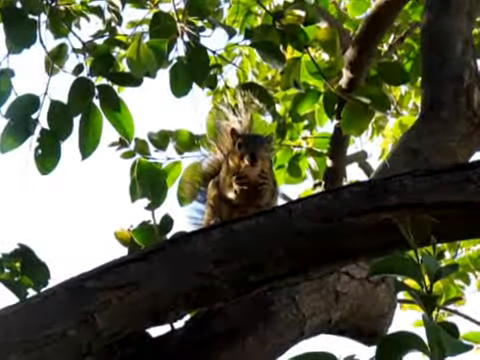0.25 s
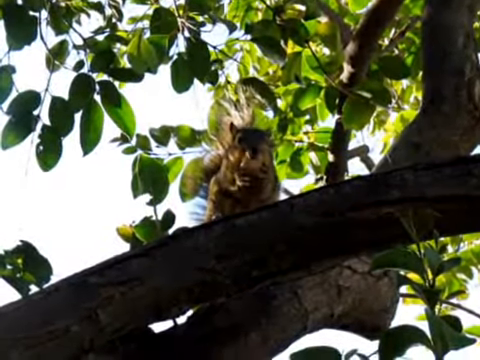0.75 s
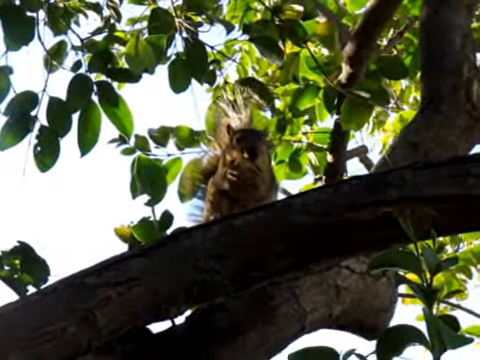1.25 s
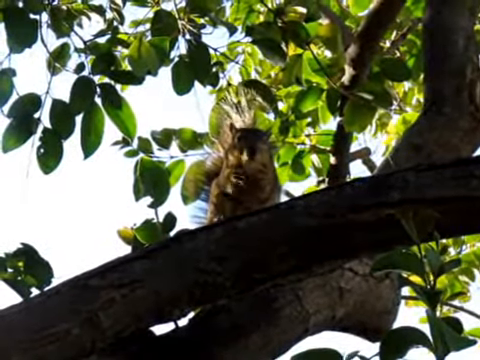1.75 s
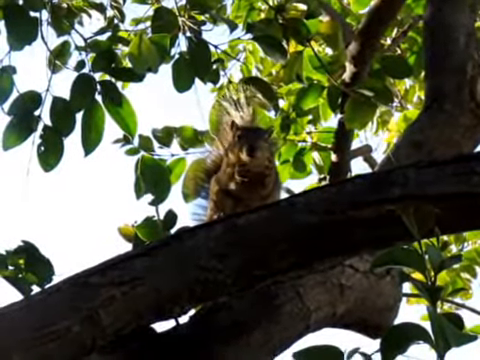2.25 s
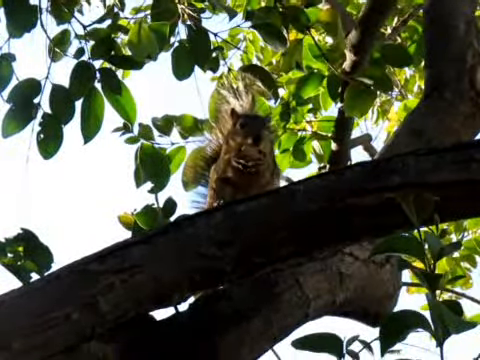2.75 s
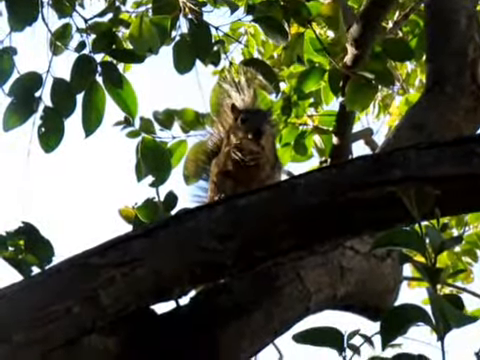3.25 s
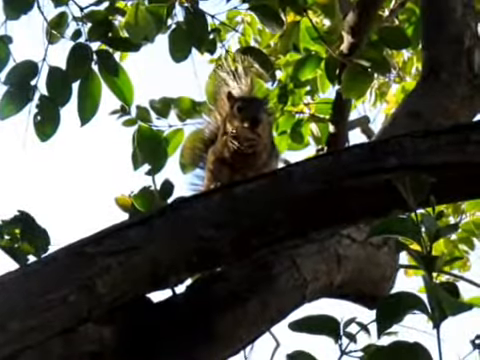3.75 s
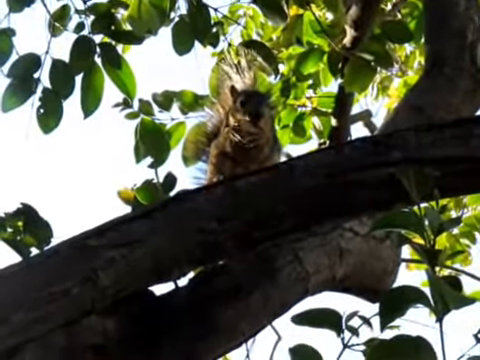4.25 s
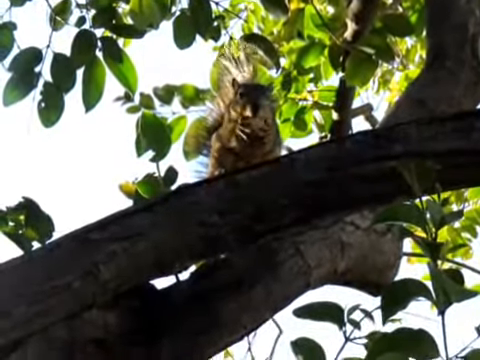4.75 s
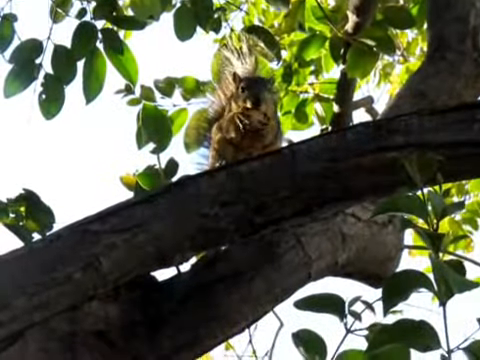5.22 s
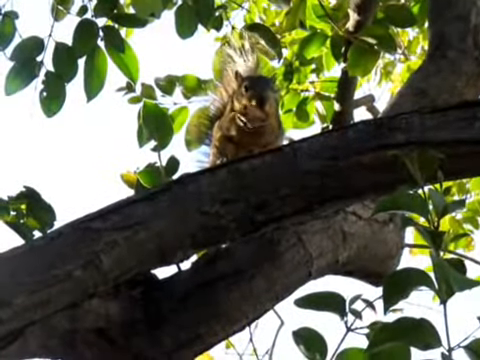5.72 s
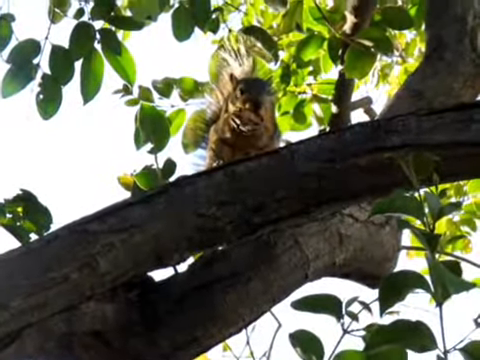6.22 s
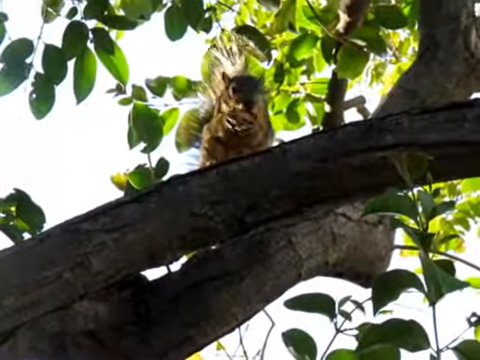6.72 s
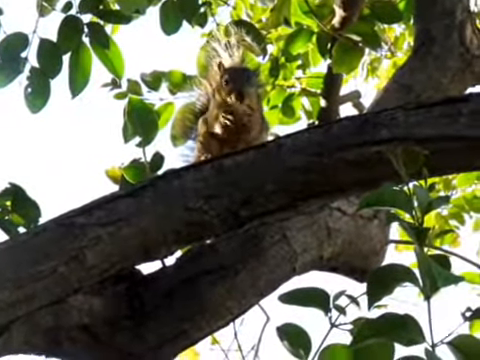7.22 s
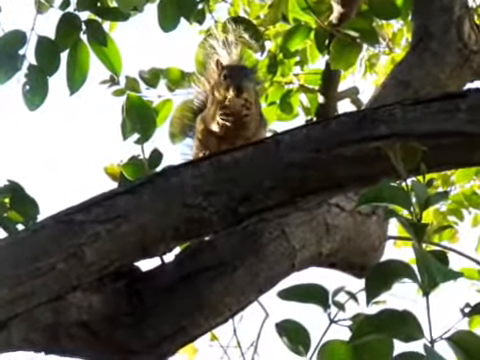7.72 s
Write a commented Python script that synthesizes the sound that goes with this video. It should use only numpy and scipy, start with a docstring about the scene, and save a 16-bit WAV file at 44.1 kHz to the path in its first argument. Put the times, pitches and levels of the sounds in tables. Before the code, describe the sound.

A steady low rumble of far traffic, a faint tonal machine drone and airy leaf rustle run throughout, with the leaves swelling in light gusts around 1.5-3.9 s and then easing. At 0.0-0.2 s a small bird gives a thin, very high buzz sliding down. Sparrows chirp all along: short falling cheeps from deep in the foliage and warbling, nearer chirrups around 0.1, 1.3, 4.3 and 6.4 s. A distant raspy trill pulses in bouts until about 4 s. A squirrel's teeth make faint dry ticks near 0.4, 2.1 and 3.7 s. A sharp, bright shell crack lands at 5.3 s, with small ticks after; a very faint high buzz follows at 5.7 s. The loudest crack snaps at 6.9 s, and the background dips for half a second. A falling sparrow warble comes at 7.4 s, with last cheeps to 8 s.

```python
"""Far traffic rumbles, a machine drones and leaves rustle throughout, all made of filtered noise and soft tones.
A small bird opens with a high falling buzz, a fast-swept whistle; sparrows chirp all along in quavering whistles.
Early on a distant bird trills in pulsed bouts, and a squirrel gnaws a nut: faint ticks that set the shell ringing.
Later come two sharp cracks of the shell, near 5.3 s and 6.9 s, and a second, much fainter buzz between them.
The loudest crack makes the recorder's gain control duck for half a second; a falling warble comes near the end."""
import sys
import numpy as np
from scipy import signal
from scipy.fft import rfft, irfft
from scipy.io import wavfile
from scipy.ndimage import minimum_filter1d

SR = 44100
rng = np.random.default_rng(int(sys.argv[2]) if len(sys.argv) > 2 else 0)


def wav_out(sig):
    """Save sig, one row per channel (or a flat mono array), as 16-bit PCM at SR to the path in sys.argv[1]."""
    wavfile.write(sys.argv[1], SR, np.round(np.clip(np.atleast_2d(sig).T, -1, 1) * 32767).astype(np.int16))


N = 351477
TIME = np.arange(N) / SR


def from_db(db):
    """Turn decibels into a factor for the wave's height."""
    return 10 ** (np.asarray(db) / 20)


def rms_one(x):
    """Scale a sound to an average power of one."""
    return x / np.sqrt(np.mean(x ** 2) + 1e-20)


def level_curve(rows):
    """Join points of time and level with straight lines, giving dB at every sample."""
    s, db = np.transpose(rows)
    return np.interp(TIME, s, db)


def add(out, s, sound):
    """Mix a sound in from a given second, cutting off what runs past the end."""
    start = max(int(s * SR), 0)
    part = sound[:max(N - start, 0)]
    out[start:start + len(part)] += part


def coloured_noise(spectrum):
    """Shape random noise to a spectrum and bring it to unit power."""
    hz, db = np.transpose(spectrum)
    bins = np.maximum(np.fft.rfftfreq(N, 1 / SR), 1)
    gain = from_db(np.interp(np.log(bins), np.log(hz), db))
    gain = gain * np.minimum(bins / hz[0], 1) ** 2  # fade out below the lowest point
    return rms_one(irfft(rfft(rng.standard_normal(N)) * gain, N))


def drift(rate):
    """Wander at random around zero with a spread of one, taking `rate` new values per second."""
    knots = rng.standard_normal(4096)
    return rms_one(np.interp(TIME * rate, np.arange(len(knots)), knots))


def resonate(x, hz, width_hz):
    """Ring like a body with one favourite pitch, where the gain is one; a narrow width rings longer."""
    r = np.exp(-np.pi * width_hz / SR)
    top = np.array([1, 0, -1]) * (1 - r * r) / 2
    return signal.lfilter(top, [1, -2 * r * np.cos(2 * np.pi * hz / SR), r * r], x)


def band(x, low_hz, high_hz, order):
    """Keep only the sound between two frequencies."""
    sos = signal.butter(order, [low_hz, high_hz], "band", fs=SR, output="sos")
    return signal.sosfilt(sos, x)


def scatter(x, t60, gap):
    """Countless small echoes from leaves and branches start after `gap` s and sink 60 dB in `t60` s."""
    t = TIME[:SR // 2]
    echoes = rng.standard_normal(len(t)) * from_db(-60 * t / t60) * (t > gap)
    # together the echoes are as strong as the sound itself
    return signal.oaconvolve(x, echoes / np.linalg.norm(echoes))[:N]


def swell(s, length, rise_s, fall_s):
    """Rise from 0 to 1, hold, and be back at 0 when the length is over."""
    return np.clip(np.minimum((TIME - s) / rise_s, (s + length - TIME) / fall_s), 0, 1)


def tone(hz):
    """Sound a pure sine of unit power that follows a pitch."""
    return np.sqrt(2) * np.sin(2 * np.pi * np.cumsum(hz) / SR)


# spectrum of the far roads: (f/Hz, level/dB per Hz)
ROAD_SPECTRUM = [(18, 0), (33, 1), (50, -2.5), (75, -3), (110, -9), (190, -16), (260, -18.5), (500, -25.5),
                 (1000, -32), (1600, -39.5), (2500, -44.5), (5000, -50), (9500, -57), (12000, -78.5)]
# loudness of the far roads: (t/s, level/dB)
ROAD_LEVEL = [(0.0, -31), (7.97, -32.5)]
# narrow bands in which a far machine drones: (f/Hz, width of each filter/Hz, level/dB)
MACHINE_BANDS = [(76, 27, -50.5), (252, 15.3, -54.5), (520, 29, -63), (1892, 29, -72)]
# distant engines that come and go: (t/s, length/s, f/Hz, level/dB)
ENGINE_PASSES = [(1.15, 1.5, 421.3, -53), (2.8, 2.01, 444, -61)]


def traffic(whine_hz=339, whine_db=-55.0, whine_waver=0.00568, engine_waver=0.00845, engine_fade_s=0.4):
    """Far roads are noise, a machine's drone is noise in narrow bands, its whine and engines are wavering tones."""
    roads = from_db(level_curve(ROAD_LEVEL)) * coloured_noise(ROAD_SPECTRUM)
    hum = 0
    for hz, width_hz, db in MACHINE_BANDS:
        noise = rng.standard_normal(N)
        narrow = resonate(resonate(noise, hz, width_hz), hz, width_hz)
        hum = hum + from_db(db) * rms_one(narrow)
    # wavers are shares of the pitch
    whine = from_db(whine_db + 2 * drift(11)) * tone(whine_hz * (1 + whine_waver * drift(20)))
    engines = 0
    for s, length, hz, db in ENGINE_PASSES:
        level = from_db(db + 2 * drift(10)) * swell(s, length, engine_fade_s, engine_fade_s)
        engines = engines + level * tone(hz * (1 + engine_waver * drift(25.06)))
    return roads + hum + whine + engines


# spectrum of the moving leaves: (f/Hz, level/dB per Hz)
LEAF_SPECTRUM = [(1000, 8), (2000, 1), (3300, 8.5), (5000, 2), (7000, 2), (8300, 4), (9400, 5.5),
                 (10300, -3), (10900, -7.5), (11700, -20), (13000, -110)]
# leaves in the slackening breeze, before gusts and flutter: (t/s, level/dB)
BREEZE_LEVEL = [(0, -56), (5.2, -60.5), (8, -61)]
# gusts: (t/s, length/s, rise in level/dB)
GUST_TIMES = [(1.446, 1, 5), (2.498, 1.39, 5)]
# brief brushing rustles, before flicker: (t at the middle/s, half length/s, level/dB)
BRUSH_TIMES = [(1.562, 0.056, -52.5), (3.66, 0.041, -53.5)]
# spectrum of the brushing: (f/Hz, level/dB per Hz)
BRUSH_SPECTRUM = [(1200, -13), (2200, 6.5), (5000, 7), (7000, 1.5), (11000, -18)]


def foliage(flutter_db=1.14, gust_build_s=0.78, gust_drop_s=0.13):
    """Leaves hiss in light air and gusts that build slowly and drop quickly; twice something brushes them."""
    gusts_db = sum(db * swell(s, length, gust_build_s, gust_drop_s) for s, length, db in GUST_TIMES)
    leaves_db = level_curve(BREEZE_LEVEL) + gusts_db + flutter_db * drift(25)
    leaves = from_db(leaves_db) * coloured_noise(LEAF_SPECTRUM)
    strokes = sum(from_db(db) * np.exp(-((TIME - s) / half) ** 2) for s, half, db in BRUSH_TIMES)
    brushing = strokes * from_db(2.6 * drift(200)) * coloured_noise(BRUSH_SPECTRUM)
    return leaves + brushing


# bouts of trilling, levels before flicker and trim:
# (t/s, length/s, middle f/Hz, first pulses per s, last pulses per s, level/dB)
TRILL_BOUTS = [(-.1, 0.68, 3870, 27, 30, -62), (0.545, 0.53, 3870, 26.2, 27.5, -59),
               (1.475, 0.93, 3950, 23.5, 30, -60.5), (2.68, 1.38, 3970, 27, 28, -64)]


def distant_trill(sag=.15, rasp=.04, wander=.009, fade_s=0.16, flicker_db=-0.5, direct_db=-1, echo_db=-6):
    """A distant bird's raspy pulses quicken in each bout; each starts at a slightly different pitch and sags."""
    song = 0
    for s, length, hz, first_rate, last_rate, db in TRILL_BOUTS:
        rate = np.interp(TIME, [s, s + length], [first_rate, last_rate])
        cycle = np.cumsum(rate * (TIME > s)) / SR % 1  # runs 0 to 1 in each pulse
        pulses = rms_one(np.sin(np.pi * cycle) ** 8)
        # sag, rasp and wander are shares of the pitch
        bend = 1 - sag * (cycle - .5) + rasp * drift(700) + wander * drift(first_rate)
        song = song + from_db(db) * swell(s, length, fade_s, fade_s) * pulses * tone(hz * bend)
    song = song * from_db(flicker_db * drift(18))
    return from_db(direct_db) * song + from_db(echo_db) * scatter(song, t60=0.29, gap=0.0035)


# a small bird's buzzes, one loud and one faint, before the throat and trim:
# (t/s, held for/s, starting f/Hz, level/dB)
BUZZ_TIMES = [(0.024, 0.14, 9150, -33), (5.711, .16, 8500, -61)]
# band the buzz is kept within: (low edge f/Hz, high edge f/Hz)
BUZZ_BAND = (7900, 9900)


def high_buzz(sweep_hz=300, swing_hz=660, jitter_hz=130, throat_hz=8350, throat_width_hz=1500,
              attack_s=0.01, release_db_per_s=270, steady_s=0.045, fall_s=0.125, fall_share=0.092,
              direct_db=-8.5, echo_db=-1):
    """A thin whistle sweeps up and down so fast that it buzzes, loudest where it meets the throat's resonance."""
    voice, t = np.zeros(N), TIME[:SR // 2]
    uneven_sweep_hz = sweep_hz * (1 + .2 * drift(250)[:len(t)])
    sweep = np.sin(2 * np.pi * np.cumsum(uneven_sweep_hz) / SR)
    jitter = jitter_hz * drift(400)[:len(t)]
    for s, held_s, hz, db in BUZZ_TIMES:
        # the pitch holds, then slides down by fall_share
        fall = 1 - fall_share * np.clip((t - steady_s) / fall_s, 0, 1)
        swing = swing_hz * fall ** 4  # the sweep narrows as the pitch falls
        level_db = db - release_db_per_s * np.maximum(t - held_s, 0)
        level = np.minimum(t / attack_s, 1) * from_db(level_db)
        add(voice, s, level * tone(hz * fall + swing * sweep + jitter))
    voice = band(resonate(voice + 1e-18, throat_hz, throat_width_hz), *BUZZ_BAND, order=4)
    return from_db(direct_db) * voice + from_db(echo_db) * scatter(voice, t60=0.078, gap=0.0022)


def whistle(contour, strokes_per_s=205, uneven=.4, edge_s=.005):
    """One unbroken whistle follows a contour while its pitch quavers in quick, uneven strokes."""
    s, *columns = np.transpose(contour)
    t = TIME[:int(max(s[-1] - s[0], .02) * SR)]
    hz, db, quaver = (np.interp(s[0] + t, s, c) for c in columns)
    pace, stray = (np.interp(t * strokes_per_s, np.arange(128), rng.standard_normal(128)) for _ in range(2))
    stroke_count = np.cumsum(strokes_per_s * (1 + .5 * uneven * pace)) / SR
    strokes = np.sin(2 * np.pi * (stroke_count + rng.random()))
    edges = np.minimum(np.minimum(t, t[-1] - t) / edge_s, 1)  # soft start and stop
    return from_db(db) * edges * tone(hz * (1 + quaver * (strokes + uneven * stray)))


def calls(motif, times):
    """A call repeats at its own level, pitch and tempo, swelling or fading as it goes."""
    out = np.zeros(N)
    delay, hz, shape_db, quaver = np.transpose(motif)
    for s, db, pitch, tempo, end_db in times:
        level_db = db + shape_db + end_db * delay / delay[-1]
        contour = np.transpose([delay / tempo, hz * pitch, level_db, quaver])
        add(out, s + delay[0] / tempo, whistle(contour))
    return out


# All sparrow levels are before the final trim; quaver is a share of the pitch.
# a cheep slides down to a clean closing note: (t after the start/s, f/Hz, level/dB, quaver)
CHEEP_SHAPE = [(0, 4480, -3, .02), (.016, 4400, .5, .028), (.034, 4050, -2, .07), (.056, 3800, -5.5, .095),
               (.068, 3350, -3, .04), (.094, 3310, -4, .028)]
# when they cheep: (t/s, level/dB, pitch ratio, tempo ratio, change of level by the end/dB)
CHEEP_TIMES = [(0.402, -50.5, 1, 1.1, -2), (1.067, -51, 0.97, 1.1, 1), (1.225, -45.5, 0.96, 0.89, -9),
               (2.03, -48, 1, 1.2, -4), (2.585, -46.5, 0.96, 1.02, 0), (2.664, -49, 0.97, 1.05, 2),
               (3.262, -51.5, 0.96, 1.55, 6), (3.349, -49.5, 0.97, 1.13, -1), (3.755, -48, 0.93, 1.2, 0),
               (4.02, -48.5, 0.98, 0.94, -4), (4.714, -50.5, 1, 1.03, 0.5), (5.354, -49.5, 0.87, 1.4, -2),
               (6.07, -50, 0.96, 0.86, 1), (6.167, -43.5, 1.03, 0.99, -4.5), (6.703, -51, 0.96, .95, 1),
               (7.297, -47.5, 0.93, 1.5, -5), (7.61, -48.5, 0.9, 0.89, -10), (7.935, -52.5, 0.92, 1.7, 0)]
# a chirrup sweeps up, warbles, dips and sinks away: (t after the start/s, f/Hz, level/dB, quaver)
CHIRRUP_SHAPE = [(.009, 2550, -8, .025), (.026, 3450, -3, .04), (.045, 3780, 0, .08), (.063, 3600, 0, .075),
                 (.072, 2620, -3.5, .035), (.085, 3450, 1.5, .055), (.1, 3650, .5, .09),
                 (.111, 3150, 1.5, .11), (.125, 2750, -1, .07)]
# the other side of the syrinx (the bird's voice box) opens it with a higher voice:
# (t after the start/s, f/Hz, level/dB, quaver)
CHIRRUP_OVERVOICE = [(0, 5400, -16, .09), (.012, 5000, -8.5, .09), (.035, 4550, -8, .08),
                     (.056, 4250, -9, .06)]
# when they chirrup: (t/s, level/dB, pitch ratio, tempo ratio, change of level by the end/dB)
CHIRRUP_TIMES = [(0.121, -47, 1.02, 1.02, 0), (1.303, -45.5, 1.04, 1.05, 2), (4.263, -46, 1, 1.07, 1.5),
                 (6.383, -46.5, 1.03, 1.0, 0), (7.425, -57.5, 0.92, 1.02, 3)]
# short harsh scolds: (t/s, length/s, first f/Hz, last f/Hz, level/dB)
SCOLDS = [(5.401, .115, 3910, 3520, -51), (6.324, .08, 3940, 3390, -48.5), (7.085, 0.05, 3710, 3290, -48)]
# a plain soft whistle: (t/s, f/Hz, level/dB, quaver)
SOFT_WHISTLE = [(7.18, 3040, -58, 0.022), (7.22, 3115, -54, .025), (7.27, 3150, -56, .035)]
# one long falling warble: (t/s, f/Hz, level/dB, quaver)
LONG_WARBLE = [(7.393, 4320, -53, 0.027), (7.435, 4080, -51.5, 0.086), (7.487, 3800, -54, 0.064),
               (7.505, 3460, -50, 0.073), (7.55, 3200, -53, 0.12)]


def sparrows(cheep_db=-4, chirrup_db=-2, scold_quaver=0.173):
    """Cheeps, scolds and a warble come from deep in the foliage, chirrups and a whistle from a nearer bird."""
    cheeps = calls(CHEEP_SHAPE, CHEEP_TIMES)
    add(cheeps, LONG_WARBLE[0][0], whistle(LONG_WARBLE))
    for s, length, first_hz, last_hz, db in SCOLDS:
        add(cheeps, s, whistle([(0, first_hz, db, scold_quaver), (length, last_hz, db, scold_quaver)]))
    chirrups = calls(CHIRRUP_SHAPE, CHIRRUP_TIMES) + calls(CHIRRUP_OVERVOICE, CHIRRUP_TIMES)
    add(chirrups, SOFT_WHISTLE[0][0], whistle(SOFT_WHISTLE))
    far_echoes = from_db(1) * scatter(cheeps, t60=.4, gap=.014)
    near_echoes = from_db(-2) * scatter(chirrups, t60=.27, gap=.01)
    return from_db(cheep_db) * (cheeps + far_echoes) + from_db(chirrup_db) * (chirrups + near_echoes)


# teeth breaking the shell, levels before the shell's ringing: (t/s, level/dB,
# place from 0 = rim to 1 = wall, level of the low knock/dB, share thrown into the leaves/dB)
BITE_TIMES = [(0.3948, -38.5, 0.25, 0, 0), (2.1012, -36, 0.28, -6, -2), (3.7176, -40, 0.18, 4, 0),
              (5.147, -44, 0.28, 8, -3), (5.3106, -12.5, 0.02, -2, 0), (5.352, -41, .15, 11, 0),
              (5.58, -38, 0.045, 9, 2), (5.985, -54, 0.3, 3, 0), (6.6138, -38.5, .5, 0, -1),
              (6.8948, -27, 0.55, -3, 0), (6.8965, -15, 0.6, 0, -1), (6.8974, -4, 0.98, -0.5, .5)]
# pitches at which the shell's rim rings, the knock first: (f/Hz, width/Hz, level/dB)
RIM_RINGING = [(2240, 390, -5), (4200, 900, -15.5), (4660, 450, -16), (6300, 1400, -5), (7300, 1100, -2),
               (9560, 840, 0.5), (10000, 400, -29)]
# pitches at which the shell's wall rings, the knock first: (f/Hz, width/Hz, level/dB)
WALL_RINGING = [(1650, 480, -13.5), (3800, 620, -10), (5950, 440, -7), (6700, 560, -3), (8240, 520, 4),
                (9800, 470, -5.5), (10800, 690, -8), (12300, 420, -12)]


def gnawing(split_s=.0005, grain_db=-5, branch_db=-3.0, leaves_db=-5, echo_low_hz=3400, echo_high_hz=10500):
    """Each split is a snap with a spray of tiny fractures that sets the shell ringing."""
    out, thrown, t = np.zeros(N), np.zeros(N), TIME[:SR // 50]
    for s, db, place, knock_db, thrown_db in BITE_TIMES:
        spray = rng.standard_normal(len(t)) * np.exp(-(t / split_s) ** 2)
        force = (t == 0) + from_db(grain_db) * spray / np.linalg.norm(spray)
        wall, snap = np.clip(place, 0, 1), 0
        for modes, share in ((RIM_RINGING, 1 - wall), (WALL_RINGING, wall)):
            for k, (hz, width_hz, mode_db) in enumerate(modes):
                level_db = db + mode_db + knock_db * (k == 0)
                # dividing by the width undoes the filter's weaker answer to a click when narrow
                height = share * from_db(level_db) * SR / (2 * np.pi * width_hz)
                snap = snap + (-1) ** k * height * resonate(force, hz, width_hz)
        add(out, s, snap)
        add(thrown, s, from_db(thrown_db) * snap)
    # twigs and leaves are small, so they throw back mainly the treble
    bright = band(thrown + 1e-18, echo_low_hz, echo_high_hz, order=2)
    near = scatter(bright, t60=.04, gap=.0018)
    far = scatter(bright, t60=.19, gap=.008)
    return out + from_db(branch_db) * near + from_db(leaves_db) * far


def scene():
    """Add up everything heard from under the tree, as one channel."""
    background = traffic() + foliage()
    birds = distant_trill() + high_buzz() + sparrows()
    return (background + birds + gnawing())[None]


def gain_control(x, threshold_db=-12, slope=0.53, hold_s=0.11, release_db_per_s=20, attack_s=.01):
    """A peak over the threshold pulls the gain down; it holds, then creeps back."""
    over_db = slope * np.maximum(20 * np.log10(np.abs(x) + 1e-9) - threshold_db, 0)
    half = int(hold_s * SR / 2)
    held_db = -minimum_filter1d(-over_db, 2 * half + 1, origin=half)
    # the cut can shrink no faster than the release
    release_db = release_db_per_s * TIME
    cut_db = np.maximum.accumulate(held_db + release_db) - release_db
    attack = np.exp(-1 / (attack_s * SR))
    return x * from_db(-signal.lfilter([1 - attack], [1, -attack], cut_db))


def record(dry, cutoff_hz=12600):
    """The recorder controls the gain, rounds the peaks and steeply cuts the top."""
    rounded = np.tanh(gain_control(dry[0]))
    top_cut = signal.ellip(10, .2, 70, cutoff_hz, fs=SR, output="sos")
    return signal.sosfilt(top_cut, rounded)[None]


dry = scene()
out = record(dry)
wav_out(out)
```